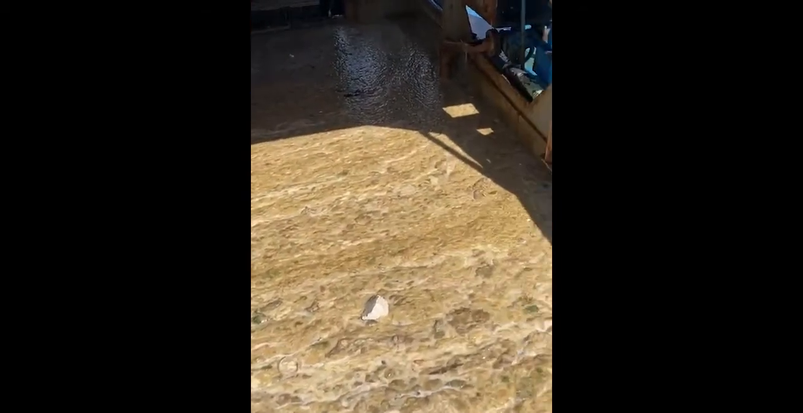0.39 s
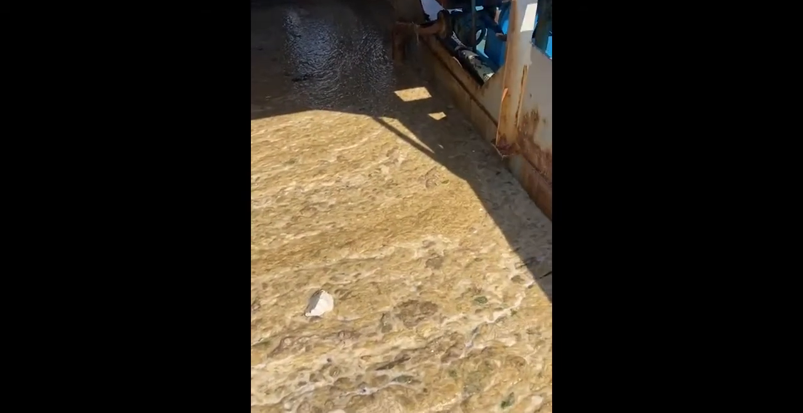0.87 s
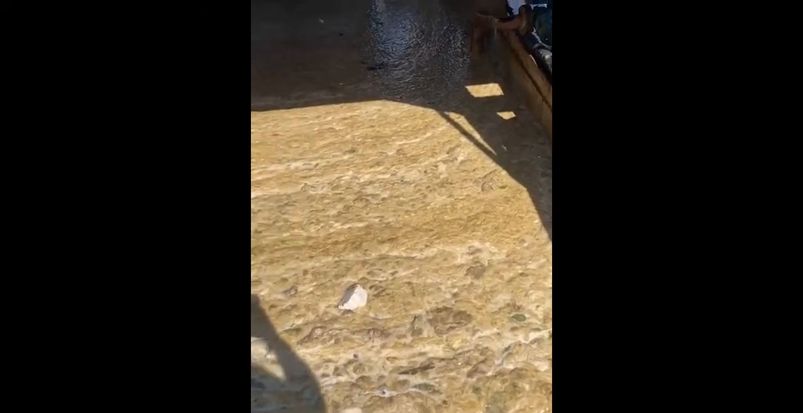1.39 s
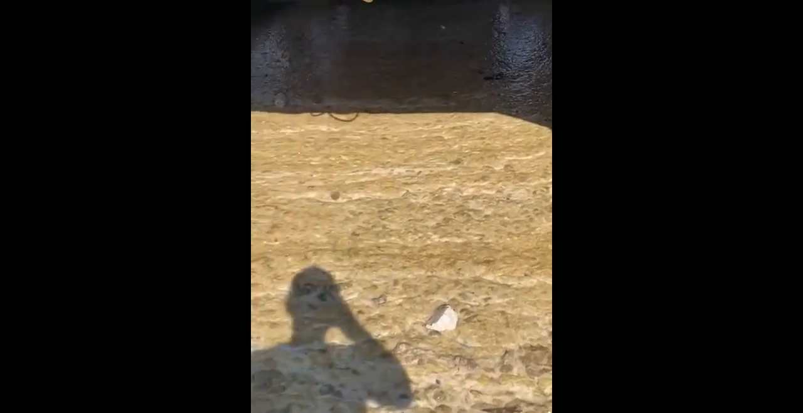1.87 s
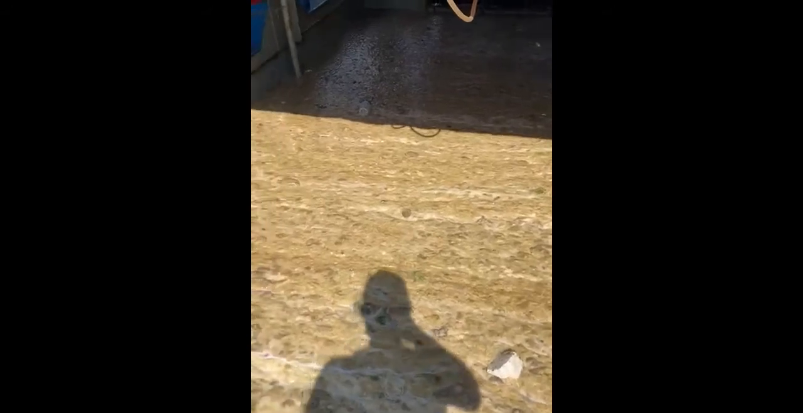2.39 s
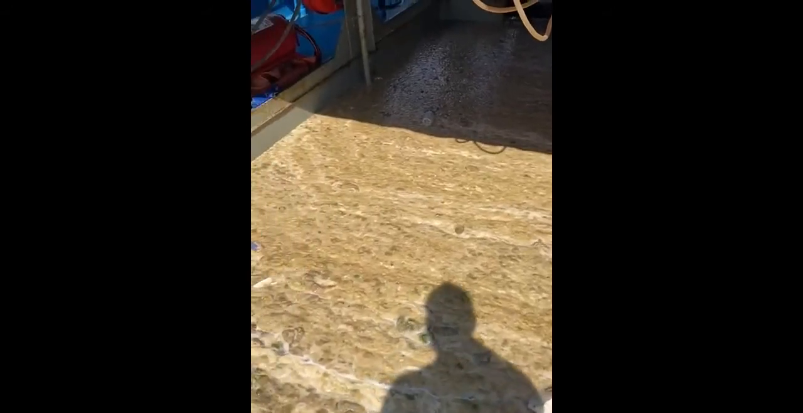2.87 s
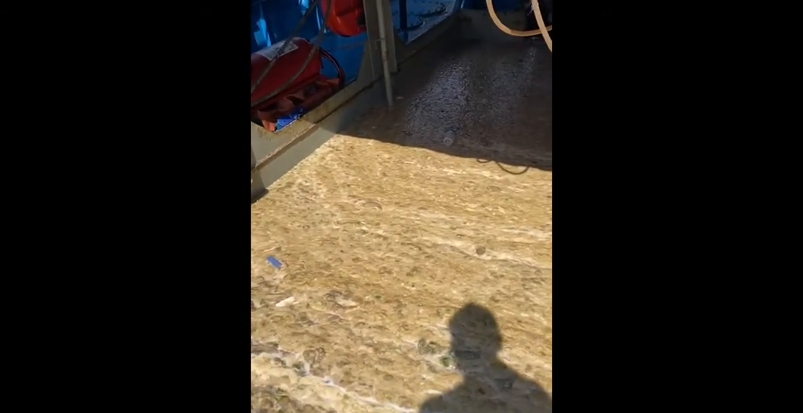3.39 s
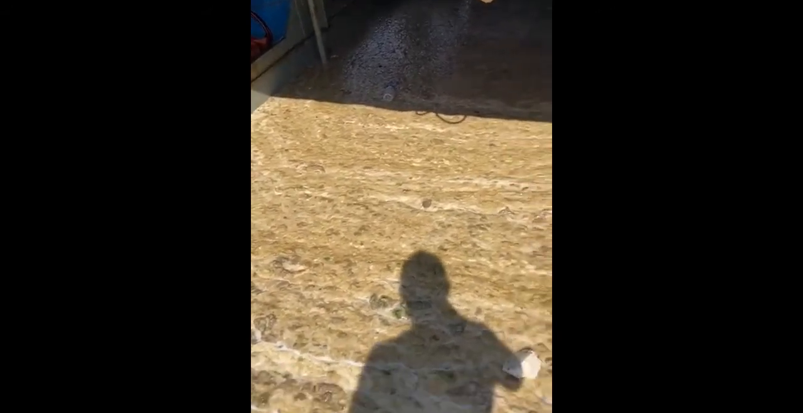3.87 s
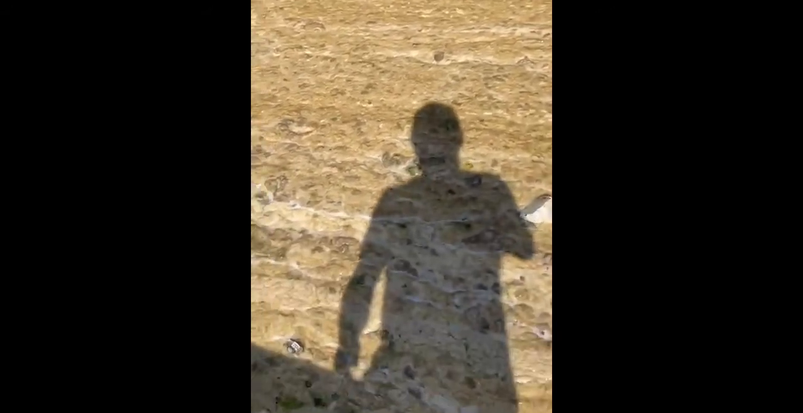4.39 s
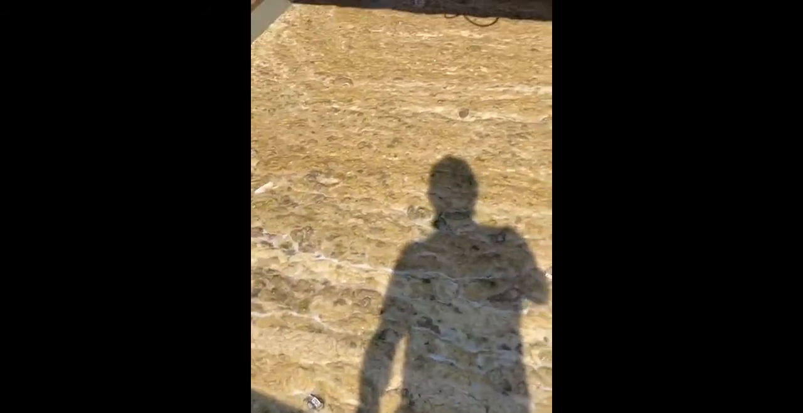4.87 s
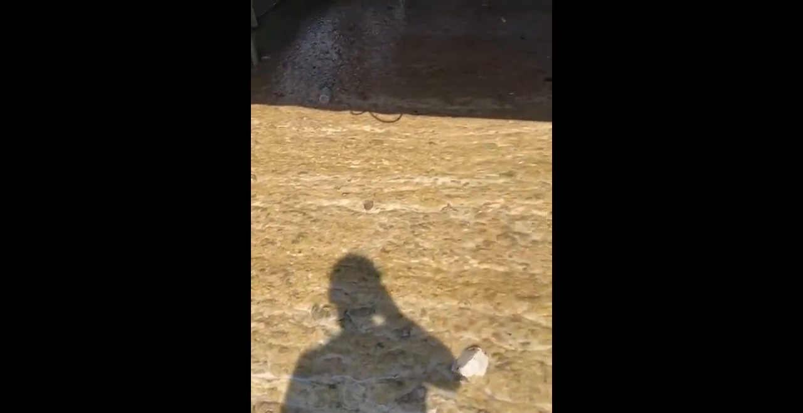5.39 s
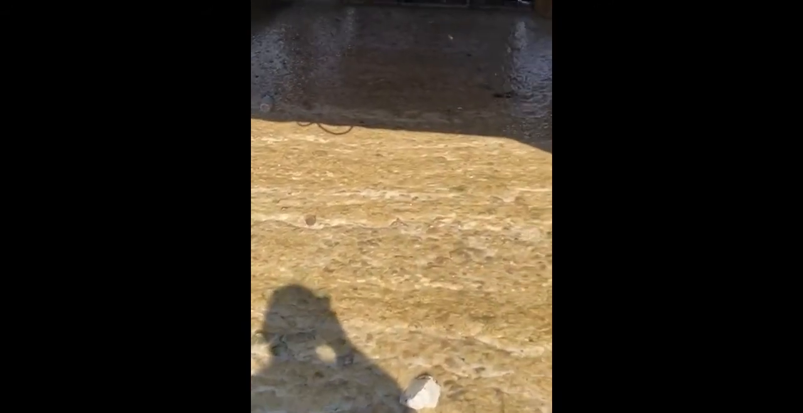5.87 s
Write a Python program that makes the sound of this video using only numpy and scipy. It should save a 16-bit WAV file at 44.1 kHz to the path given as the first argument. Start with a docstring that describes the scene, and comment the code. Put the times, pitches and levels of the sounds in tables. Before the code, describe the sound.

For six seconds two diesel engines drone on a moving boat, steady from start to finish. Their deep hums, slightly different in speed, throb together, the lowest tones a little stronger on the left. Over them lies a wide, rough roar with fast regular clatter, ringing metallic bands and a thin singing gearbox; pitch rises only minutely around 4 s. A soft watery hiss in the centre is strongest during the first two seconds, fades towards 3.5 s, swells at about 4.3 s, drops and rises again at the end. Wind buffets the hand-held phone unevenly, with low flutter, slaps and thumps crowding 0 to 2.5 s, a heavy slap near 1.6 s, more at 3.0 and 3.4 s, then a calmer stretch until gusts at 5.3 to 5.75 s. Small crackling spits of spray flick by at 2.6 s, faintly, and 3.8 s, more clearly.

```python
"""Two diesel engines on a moving boat run at nearly steady, different speeds and throb against each other: sines
locked to their shafts, with a singing gearbox and a roar of pulsed noise and clatter with ringing bands.
A hiss in the middle of the stereo image rises and falls, and short spits of spray crackle.
Wind buffets the two microphone ports of a hand-held phone: uneven low noise, slaps and single thumps."""
import sys
import numpy as np
from scipy import signal
from scipy.fft import rfft, irfft, next_fast_len
from scipy.io import wavfile
from scipy.ndimage import uniform_filter1d, map_coordinates

SR = 44100
rng = np.random.default_rng(int(sys.argv[2]) if len(sys.argv) > 2 else 0)


def boost_factor(decibels):
    """Convert a level in decibels to a linear amplitude factor."""
    exponent = np.asarray(decibels, float) / 20
    return 10 ** exponent


def output_pcm(signal):
    """Save a mono or channel-first signal as 16-bit PCM at the path in sys.argv[1].

    Samples are clipped to [-1, 1] before scaling.
    """
    pcm = np.clip(np.atleast_2d(signal).T, -1, 1) * 32767
    wavfile.write(sys.argv[1], SR, np.round(pcm).astype(np.int16))


N = 264335  # samples

# colour shared by the engine room roar and the clatter: (frequency [Hz], relative density [dB])
ROAR_COLOUR = [(30, -14), (100, -6), (200, -4), (300, -8), (500, -8), (730, -3), (900, -6), (1300, -7),
               (1500, -10), (2300, -13), (3300, -21), (5200, -26), (7700, -33), (10800, -35), (11800, -41)]


def unit(x):
    """Scaled to rms 1."""
    return x / np.sqrt(np.mean(x ** 2) + 1e-20)


def along(points, hz):
    """Columns of (Hz, value, ..) points read on a log frequency axis."""
    f, *cols = np.transpose(points)
    return [np.interp(np.log(hz + 1), np.log(f + 1), c) for c in cols]


def curves(rows):
    """One value per sample for each column after the time."""
    s, *cols = np.transpose(rows)
    return [np.interp(np.arange(N) / SR, s, c) for c in cols]


def wobble(rate):
    """A smooth random curve, rate knots a second."""
    knots = rng.standard_normal(int(N * rate / SR) + 4)
    return map_coordinates(knots, [np.arange(N) * rate / SR])


def filtered(x, response):
    """x passed through a complex response of frequency."""
    m = next_fast_len(N + 8192)
    return irfft(rfft(x, m) * response(np.fft.rfftfreq(m, 1 / SR)), m)[..., :N]


def rush(spectrum, patchy_db, channels):
    """Unrelated coloured noises, rms 1 overall, with gain patches in time and frequency common to all."""
    z = signal.stft(rng.standard_normal((channels, N)), nperseg=512)[2]
    field = uniform_filter1d(rng.standard_normal(z.shape[1:]), size=6, axis=0)
    field = uniform_filter1d(field, size=14, axis=1)
    noise = signal.istft(z * boost_factor(patchy_db * unit(field)), nperseg=512)[1][:, :N]
    return unit(filtered(noise, lambda hz: boost_factor(along(spectrum, hz)[0])))


def crank(speed, start):
    """Angle of the four-stroke engine cycle in radians, summed from its rate; start is in cycles."""
    return 2 * np.pi * (start + np.cumsum(curves(speed)[0]) / SR)


def tones(angle, orders, shake, waver_db):
    """Sines locked to a shaft; torsional shake blurs the high orders and each level wavers."""
    skew = .45  # radians of phase lead added per order of the cycle above 6.4, which skews the pulse
    angle = angle + shake * wobble(2.85)
    total = np.zeros(N)
    for order, db in orders:
        level_db = db + waver_db * (wobble(1.9) + .7 * wobble(4))
        lead = skew * (max(order, 6.4) - 8) if order < 15 else rng.uniform(0, 2 * np.pi)
        total += np.sqrt(2) * boost_factor(level_db) * np.cos(order * angle + lead)
    return total


def clatter(angle, level_db):
    """Valves and pistons strike in the same pattern on every turn of the shaft, in two knocks a turn."""
    steps = round(SR / 19.6)  # about the samples in one turn
    place = np.arange(steps) / steps
    pattern = rng.standard_normal(steps) * (2.2 + np.exp(-6 * (2 * place % 1)))
    # two turns of the shaft to one engine cycle
    strokes = map_coordinates(pattern, [(angle / np.pi % 1) * steps], mode="grid-wrap")
    uneven = strokes * boost_factor(1.5 * wobble(20))
    coloured = filtered(uneven, lambda hz: boost_factor(along(ROAR_COLOUR, hz)[0]) * (hz > 450))
    return boost_factor(level_db) * unit(coloured)


def roar(angle, level_db):
    """Combustion noise, swelling and pulsed by the firings, and clatter, both through ringing bands."""
    # narrow wavering hums and broader ringing bands: (frequency [Hz], width [Hz], level [dB])
    bands = [(206, 10, -5), (265, 8, -3), (392, 6, 2), (640, 60, -9), (745, 60, -7), (2030, 70, -6),
             (2850, 150, -8), (3550, 150, -8), (4880, 120, -6)]
    # slow changes in the roar's treble and body: (time [s], treble gain [dB], body gain [dB])
    tone_drift = [(0, -1, -0.5), (1.2, -2, 0.5), (1.8, 1.5, -.5), (3.7, -1, -1), (4.2, -0.5, 1), (6, 1, -1)]

    def ringing(f):
        return 1 + sum(boost_factor(db) * 1j * f * w / (c * c - f * f + 1j * f * w) for c, w, db in bands)

    firing = 1 + .05 * np.cos(4 * angle) + .03 * np.cos(8 * angle)
    pulse = firing * boost_factor(.2 * wobble(7) + .4 * wobble(15))
    noise = pulse * rush(ROAR_COLOUR, patchy_db=1.2, channels=2)
    # clatter joins the first noise only
    noise = noise + clatter(angle + .003 * wobble(3), level_db=-8) * [[1], [0]]
    room = filtered(noise, ringing)
    treble = filtered(room, lambda hz: 1 / (1 + (3150 / (hz + 1)) ** 4) / (1 + (hz / 6500) ** 12))
    body = filtered(room, lambda hz: 1 / (1 + (170 / (hz + 1)) ** 4) / (1 + (hz / 500) ** 4))
    treble_db, body_db = curves(tone_drift)
    drifting = room + (boost_factor(treble_db) - 1) * treble + (boost_factor(body_db) - 1) * body
    return boost_factor(level_db) * drifting


def stereo_image(alike_part, differing_part):
    """One part is shared by left and right, the other opposed; the left lags in phase."""
    # stereo image, nearly mono or opposed in some bands:
    # (frequency [Hz], likeness [0-1], phase lag of the left [rad])
    image = [(40, .95, .1), (300, .92, .2), (500, .65, 1.4), (730, .8, 2.05), (1300, .62, 2.15),
             (1900, .7, 2.7), (2400, .88, 3.1), (2900, .94, 3.14), (3500, .92, 3.14), (4300, .55, 3.7),
             (5300, .7, 3.4), (6000, .97, 3.14), (7000, .7, 4.7), (7800, .93, 6.28), (9200, .93, 6.28),
             (10200, .7, 7.9), (11000, .93, 9.42)]

    def mix(hz):
        alike, lag = along(image, hz)
        turn = np.arccos(np.clip(alike, 0, 1)) / 2
        phase = np.exp(.5j * lag * [[-1], [1]])  # half the lag on each channel
        return np.cos(turn), np.sin(turn), phase

    def shared(hz):
        share, _, phase = mix(hz)
        return share * phase

    def opposed(hz):
        _, share, phase = mix(hz)
        return share * phase * [[1], [-1]]

    return filtered(alike_part, shared) + filtered(differing_part, opposed)


def engines():
    """Shaft tones of both engines and the gearbox, with the roar, in stereo; the hum leans left."""
    # speed of each engine: (time [s], four-stroke cycles [per s])
    main_speed = [(0, 9.803), (1.5, 9.802), (2.5, 9.797), (3.3, 9.798), (4, 9.817), (6, 9.819)]
    second_speed = [(0, 8.486), (1.5, 8.478), (3, 8.474), (4, 8.495), (5, 8.51), (6, 8.51)]
    # steady tones before the hum trim: (multiple of the cycle rate, level [dB])
    main_orders = [(4, -29.5), (6, -34.5), (8, -25), (10, -41), (12, -41), (14, -47), (24, -50), (26, -50),
                   (28, -49), (32, -50), (34, -51), (38, -53), (46, -54), (60, -50), (64, -46), (66, -47),
                   (74, -45), (76, -47), (96, -47), (108, -48), (120, -48), (136, -51), (140, -48),
                   (144, -50)]
    second_orders = [(4, -40), (6, -43), (8, -28.5), (12, -40), (16, -46), (18, -47), (24, -40), (26, -48),
                     (34, -48), (46, -50)]
    # gearbox tones, geared down by three: (multiple of a third of the main cycle rate, level [dB])
    gear_orders = [(64, -45), (81, -43), (88, -48), (190, -45), (196, -44), (224, -43), (232, -41),
                   (256, -44), (280, -51), (337, -51), (421, -53)]
    main, second = crank(main_speed, start=.165), crank(second_speed, start=.085)
    hum = tones(main, main_orders, shake=.004, waver_db=.8)
    hum = hum + tones(second, second_orders, shake=.006, waver_db=.9)
    hum = hum + tones(main / 3, gear_orders, shake=.0015, waver_db=1.5)
    hum = boost_factor(-0.93) * hum
    # the low hum is stronger on the left
    lean = lambda hz: boost_factor(1.5 / (1 + (hz / 300) ** 2) * [[1], [-1]])
    roar_alike, roar_differing = roar(main, level_db=-25.5)
    return filtered(stereo_image(hum, 0 * hum), lean) + stereo_image(roar_alike, roar_differing)


def centred_hiss():
    """In-phase hiss in the middle of the stereo image, rising and falling, plus a weaker opposed part."""
    # level of the centred hiss: (time [s], level [dB])
    hiss_level = [(0, -36.5), (.5, -37), (1, -35.5), (1.5, -37), (2, -38), (2.5, -46), (3, -46.5),
                  (3.5, -51), (3.9, -45), (4.3, -40), (4.6, -43), (5, -47.5), (5.5, -47), (6, -41.5)]
    # its colour: (frequency [Hz], relative density [dB])
    colour = [(600, -18), (1200, -7), (1700, -1), (2300, 0), (2900, -3), (3400, -11), (4500, -13),
              (5500, -24), (6100, -40), (7200, -25), (10200, -24), (11000, -120)]
    alike, apart = boost_factor(curves(hiss_level)[0]) * rush(colour, patchy_db=1.1, channels=2)
    return alike + boost_factor(-4.5) * apart * [[1], [-1]]


def wind():
    """Eddies thump the ports in lumps; stronger wind flutters more; the ports feel it partly in opposition."""
    # thud of the breeze under the gusts: (time [s], level [dB])
    breeze = [(0, -25.5), (.5, -31.5), (1.3, -27), (1.8, -37), (2.1, -23), (2.7, -27.5), (2.9, -30),
              (3.3, -33), (4.1, -27), (4.45, -39), (4.9, -35), (6, -31)]
    # gusts on the ports: (time [s], rise over the breeze [dB], half width [s])
    gusts = [(.34, 7, 0.098), (.62, 7, .05), (.8, 6, 0.055), (1.17, 4, 0.059), (1.54, 7, 0.17),
             (1.93, 11, 0.045), (2.2, -5, 0.13), (2.55, 0.5, 0.18), (3.08, 2, 0.2), (3.42, 2.5, 0.066),
             (3.87, 2, 0.086), (5.62, 5, 0.17)]
    # sudden slaps: (time [s], flutter at the peak [dB], half width [s])
    slap_times = [(.29, -30, .015), (.39, -28, .015), (.57, -27, .015), (1.12, -30, .015),
                  (1.615, -21, .025), (2.12, -30, .015), (2.23, -29, .02), (2.47, -28, .015),
                  (3.01, -31, .015), (3.42, -29, .015), (5.74, -30, .012)]
    # colours of thud and flutter: (frequency [Hz], relative density [dB])
    thud_colour = [(30, -8), (75, 0), (130, -6), (200, -18), (400, -40), (1000, -120)]
    flutter_colour = [(100, -14), (200, 0), (350, -3), (500, -9), (900, -25), (2000, -120)]
    t = np.arange(N) / SR
    thud_db = curves(breeze)[0]
    thud_db = thud_db + sum(rise_db * np.exp(-((t - s) / width) ** 2) for s, rise_db, width in gusts)
    thud_db = thud_db + 2.1 * wobble(6.9)  # random unsteadiness
    flutter_db = -42 + 1.5 * (thud_db + 30)  # flutter grows faster than thud
    slaps = sum(boost_factor(db) * np.exp(-((t - s) / width) ** 2) for s, db, width in slap_times)
    lumps = boost_factor(2 * wobble(18))
    thud = unit(lumps * rush(thud_colour, patchy_db=.5, channels=2))
    thud = (boost_factor(thud_db) + boost_factor(1.5) * slaps) * thud
    flutter = unit(lumps * boost_factor(2 * wobble(25)) * rush(flutter_colour, patchy_db=.5, channels=2))
    flutter = np.maximum(boost_factor(flutter_db), slaps) * flutter
    # first row is felt alike at both ports, second in opposition
    common, opposed = boost_factor([[-6], [.8]]) * thud + boost_factor([[-15], [0]]) * flutter
    return np.array([common + opposed, common - opposed])


def thumps():
    """Single eddies suck at the ports, most at the right: a dip in pressure with a short ripple either side."""
    # (time [s], peak at the right port [dB])
    eddies = [(.048, -21), (.196, -20), (.405, -15), (.576, -18), (1.04, -18), (1.188, -20), (1.385, -18),
              (1.6595, -14), (1.9156, -17), (2.272, -18), (2.487, -16), (3.01, -20), (5.346, -22),
              (5.751, -19)]
    ripple_hz, half_width_s, left_db = 120, .009, -6
    t = np.arange(N) / SR
    dips = np.zeros(N)
    for s, db in eddies:
        bell = np.exp(-((t - s) / half_width_s) ** 2)
        dips += boost_factor(db) * bell * np.cos(2 * np.pi * ripple_hz * (t - s))
    return -dips * boost_factor([[left_db], [0]])


def hollowed(x):
    """The common part of left and right briefly thins in a band."""
    # (time [s], half width [s], frequency [Hz], half bandwidth [Hz], share lost [0-1])
    hollows = [(4.33, .33, 850, 70, .7), (1.56, .07, 400, 110, .7), (2.11, .03, 300, 170, .7),
               (.6, .025, 480, 110, .7)]
    t, common = np.arange(N) / SR, x.mean(axis=0)
    for s, half, hz, width, lost in hollows:
        band = filtered(common, lambda f: np.exp(-((f - hz) / width) ** 4))
        x = x - lost * np.exp(-((t - s) / half) ** 4) * band
    return x


def spray():
    """Each spit of spray starts sharply and dies exponentially as a crackling hiss."""
    # (time [s], starting level before the crackle [dB], fall by 60 dB [s])
    spits = [(2.615, -41, .1), (3.791, -32.5, .14)]
    # (frequency [Hz], relative density [dB])
    colour = [(3000, -12.5), (6000, -22), (9500, -9.5), (12000, -32)]
    t = np.arange(N) / SR
    decay = sum(boost_factor(db - 60 * np.clip(t - s, 0, None) / t60) * (t > s) for s, db, t60 in spits)
    crackle = boost_factor(3 * wobble(300))
    alike, differing = decay * crackle * rush(colour, patchy_db=.5, channels=2)
    return stereo_image(alike, differing)


def scene():
    """Engines and hiss, briefly hollowed, with wind, thumps and spray on top."""
    return hollowed(engines() + centred_hiss()) + wind() + thumps() + spray()


def band_limit(x):
    """A steep low-pass at the top of the band."""
    return signal.sosfilt(signal.butter(12, 11800, fs=SR, output="sos"), x)


def record(dry):
    """The phone cuts the deep bass steeply, below about 36 Hz."""
    cut = filtered(dry, lambda hz: 1 / np.sqrt(1 + (36 / (hz + 1)) ** 12))
    return band_limit(cut)


dry = scene()
out = record(dry)
output_pcm(out)
```